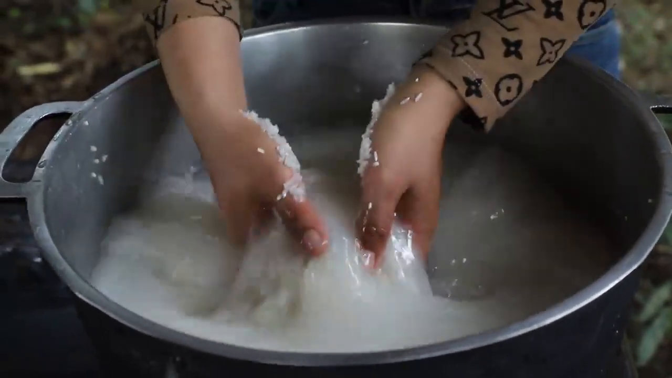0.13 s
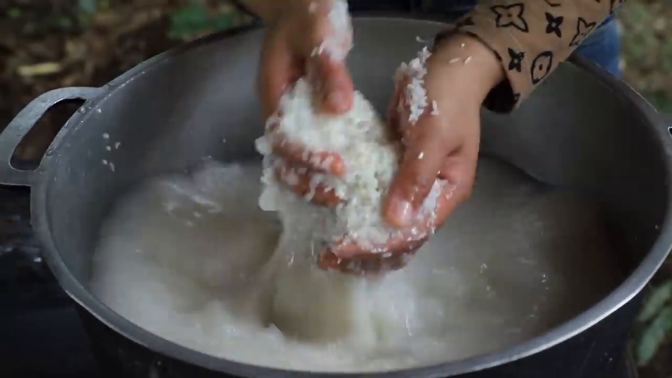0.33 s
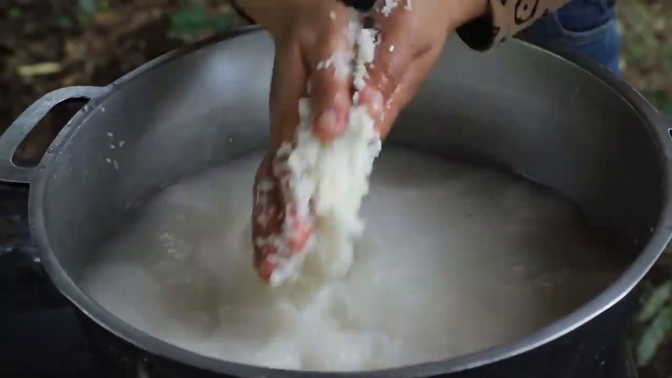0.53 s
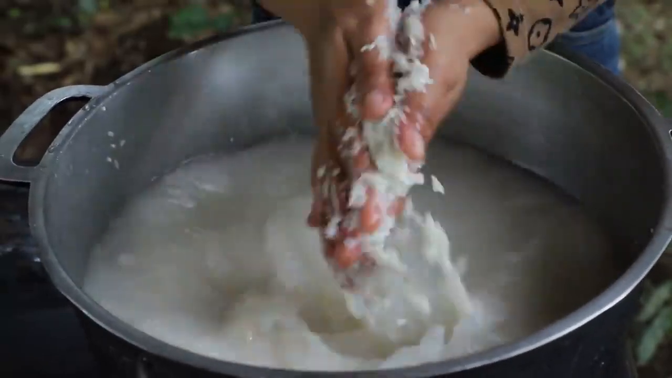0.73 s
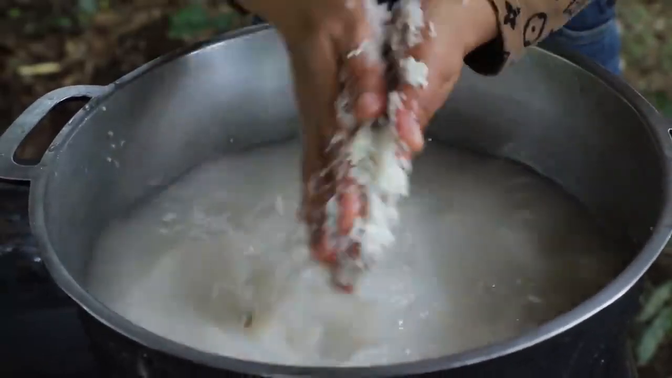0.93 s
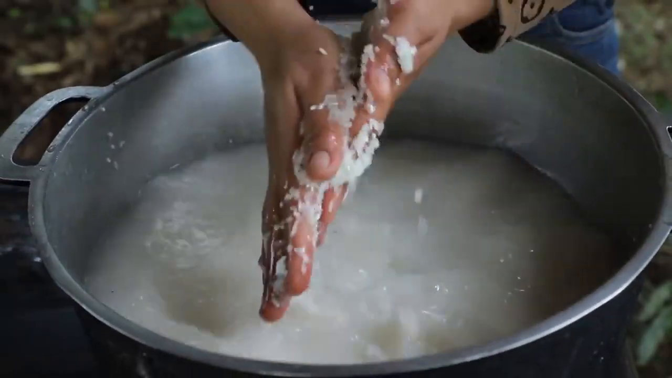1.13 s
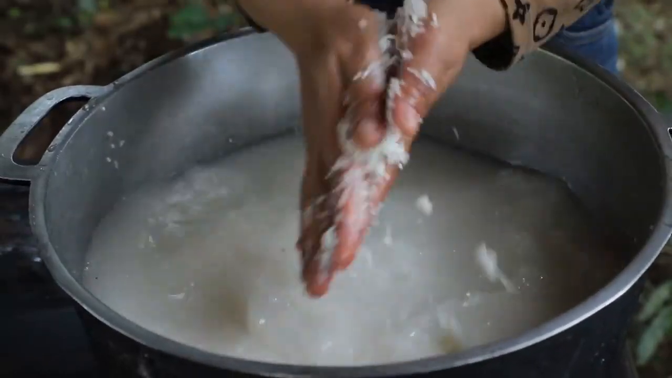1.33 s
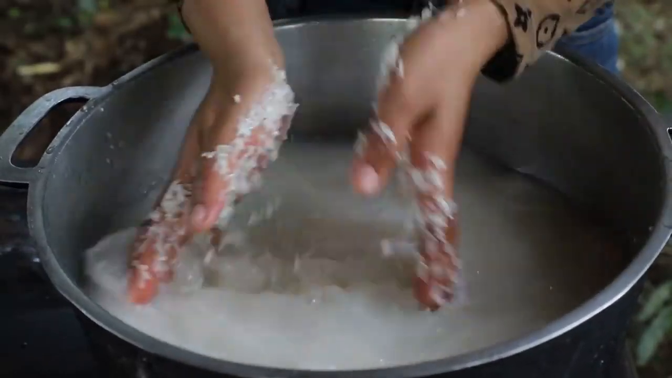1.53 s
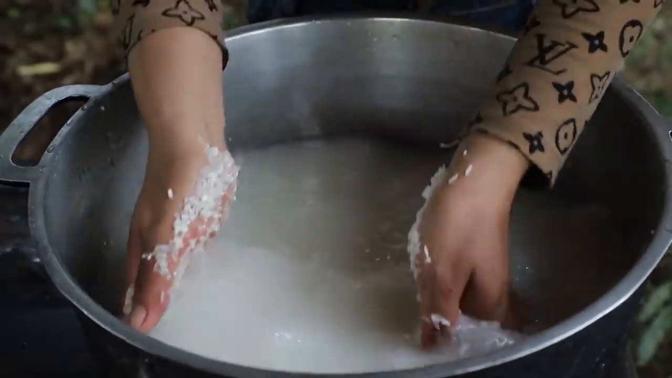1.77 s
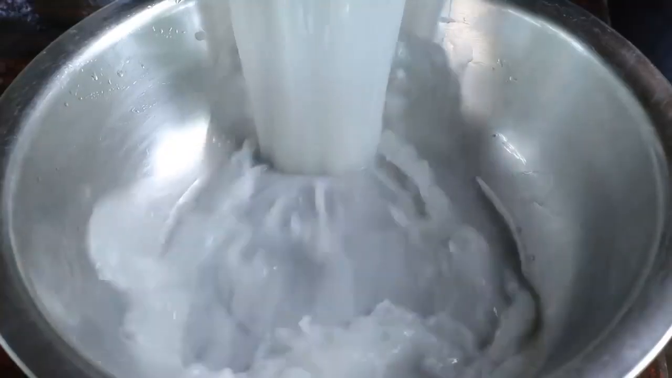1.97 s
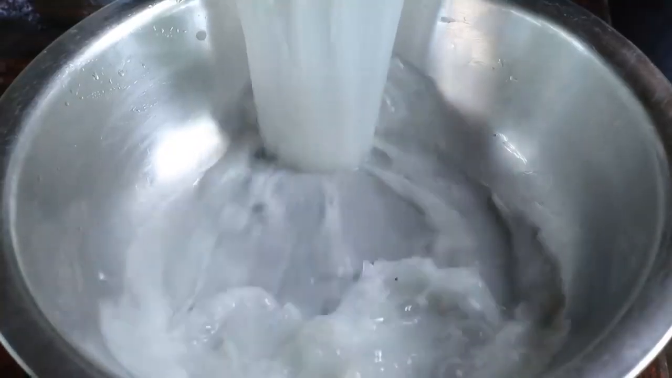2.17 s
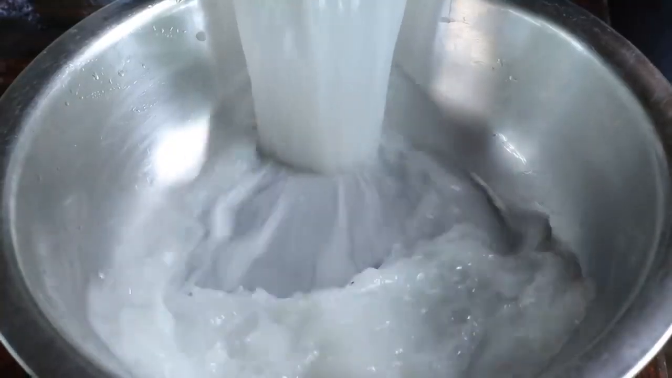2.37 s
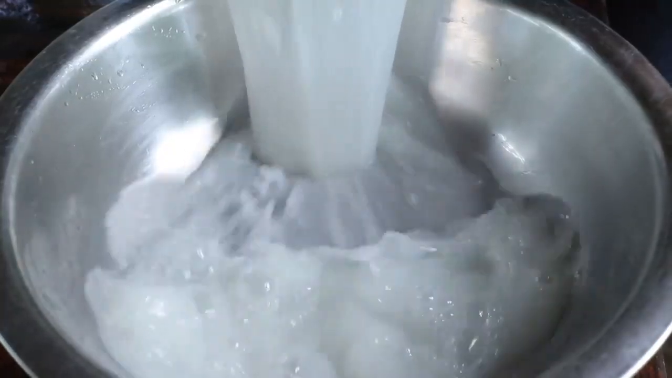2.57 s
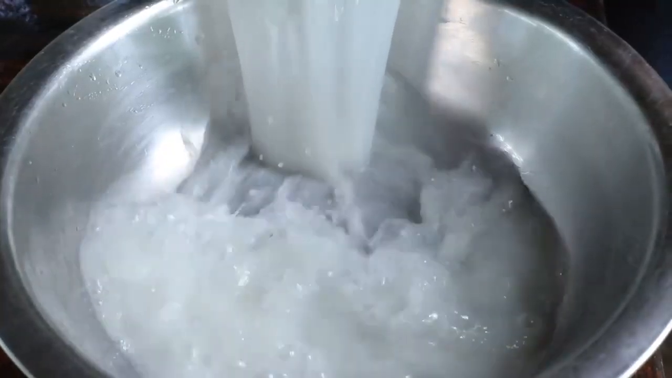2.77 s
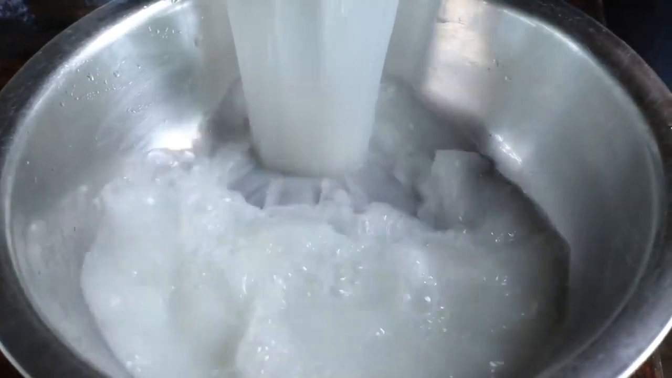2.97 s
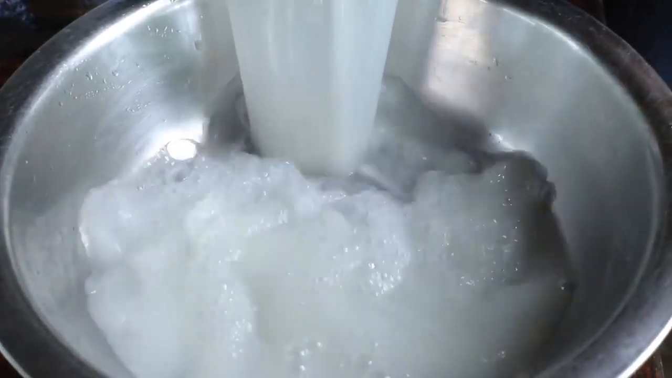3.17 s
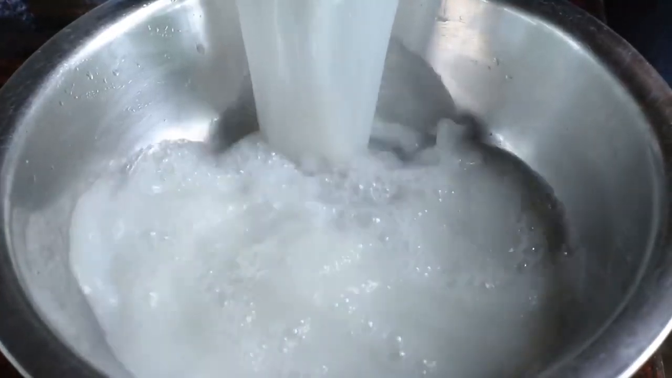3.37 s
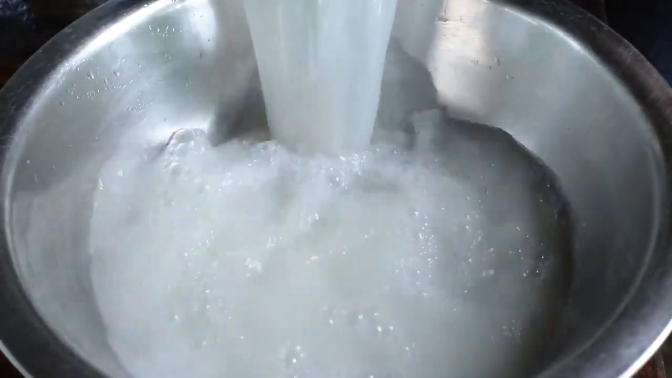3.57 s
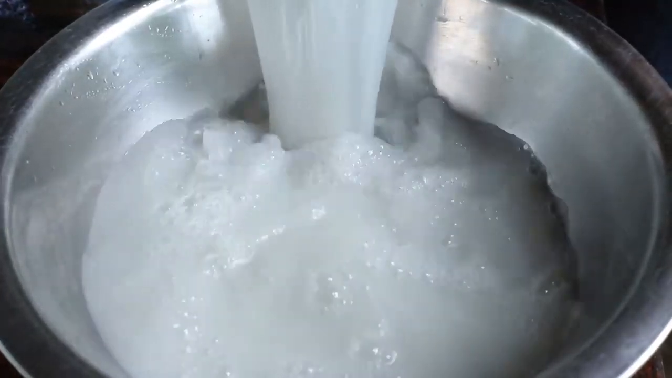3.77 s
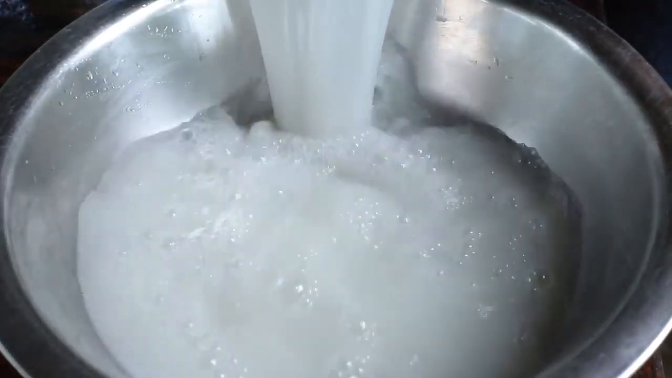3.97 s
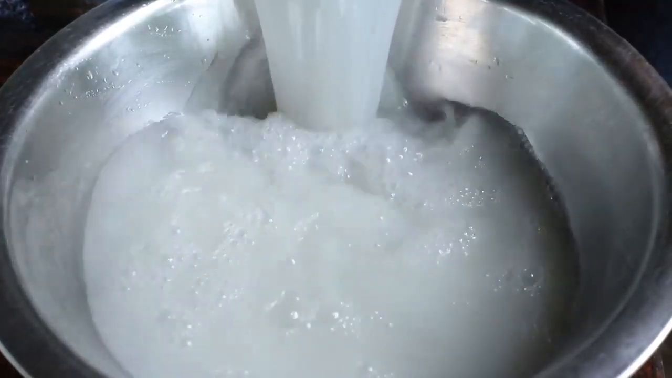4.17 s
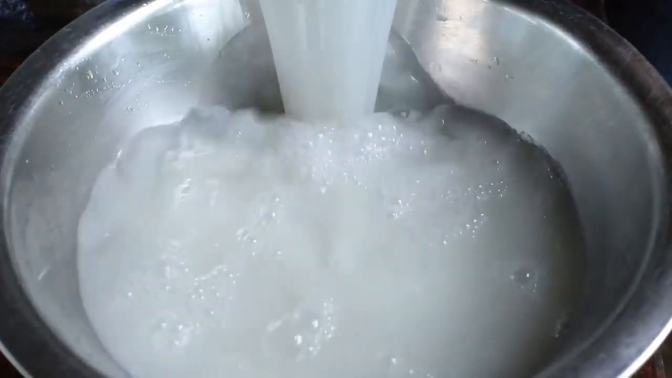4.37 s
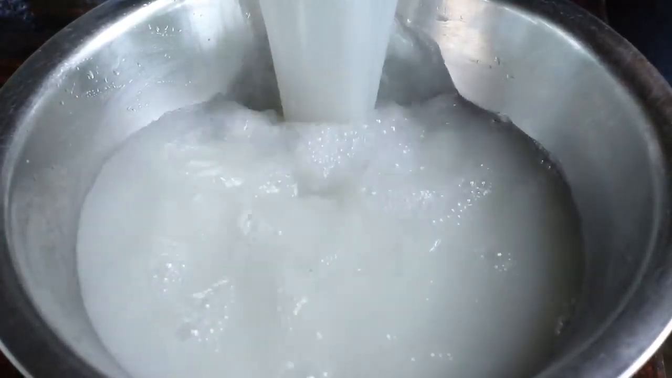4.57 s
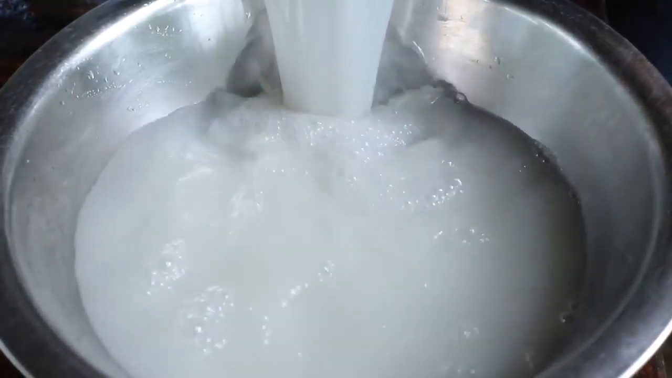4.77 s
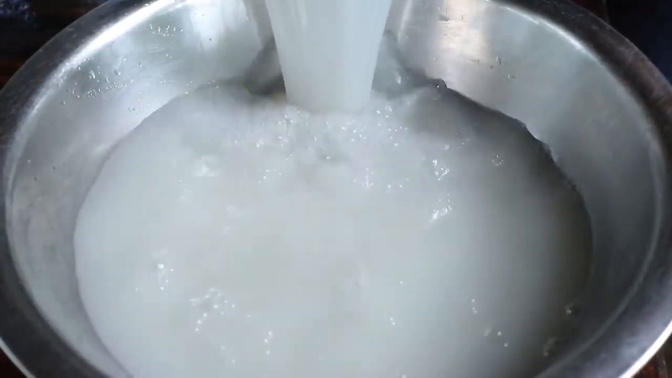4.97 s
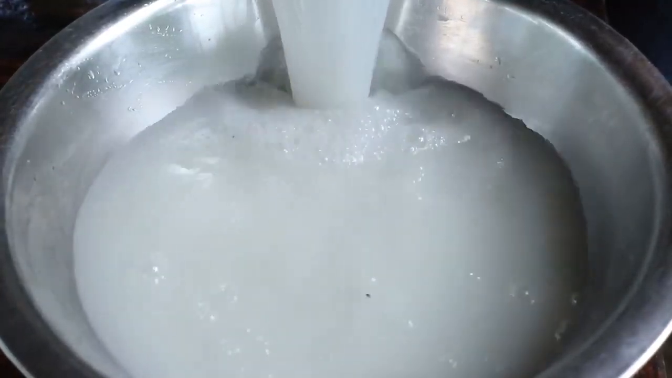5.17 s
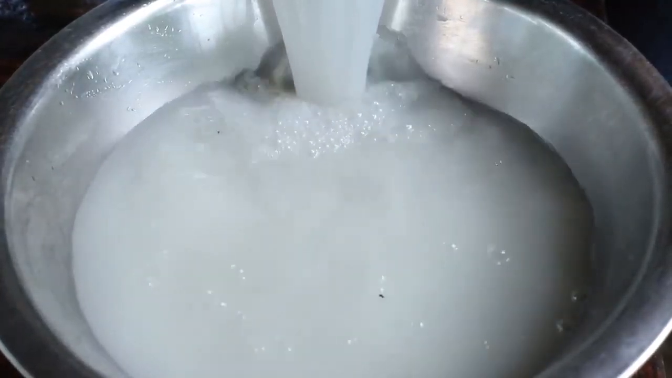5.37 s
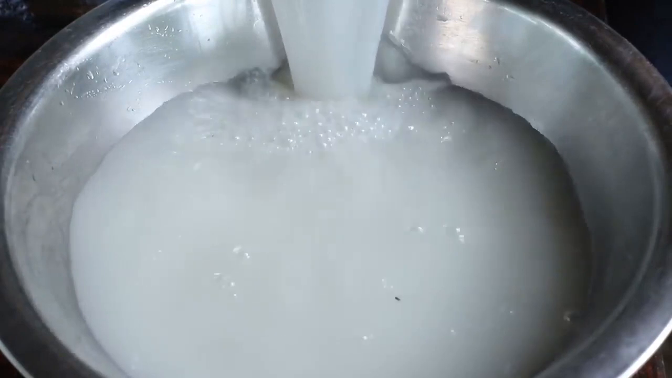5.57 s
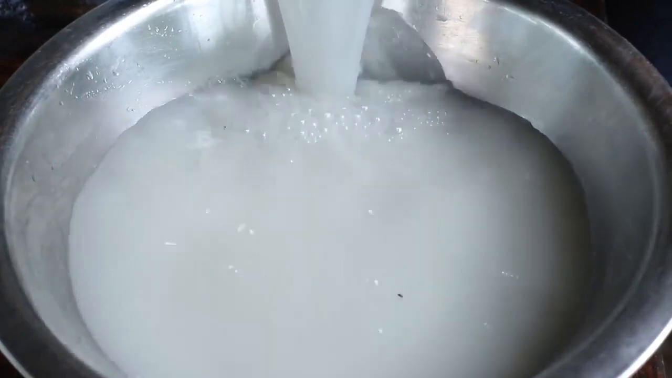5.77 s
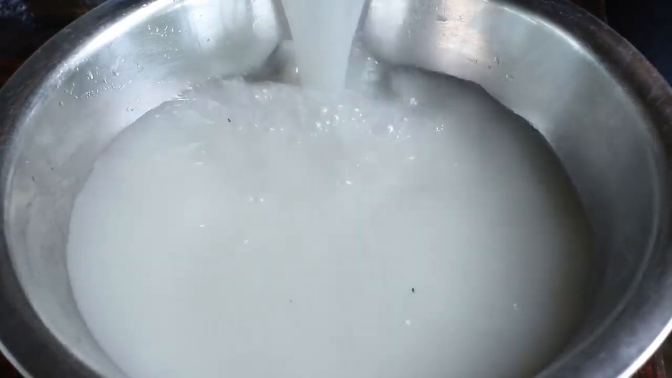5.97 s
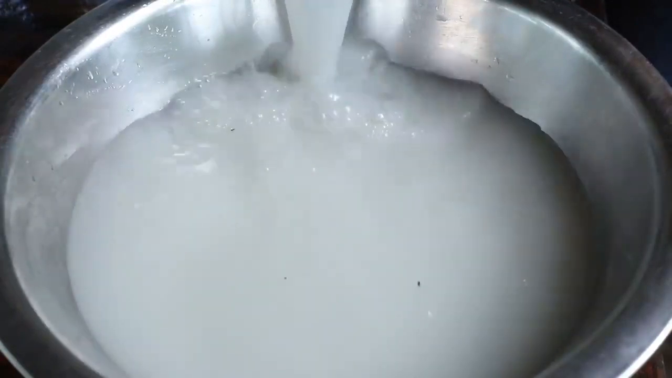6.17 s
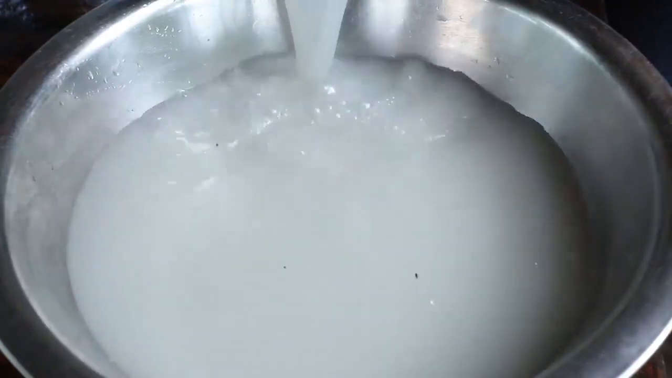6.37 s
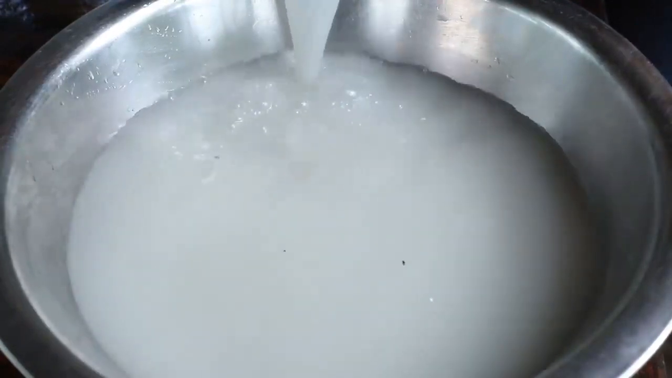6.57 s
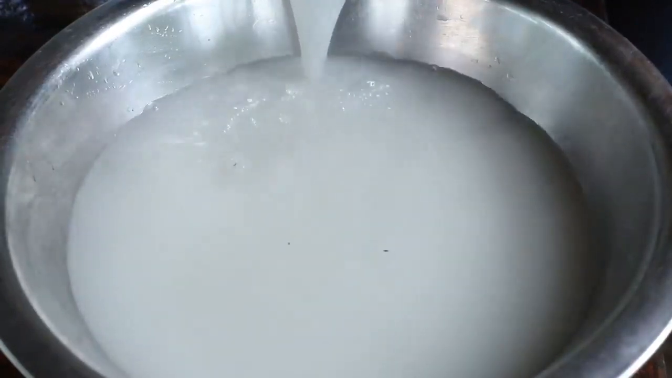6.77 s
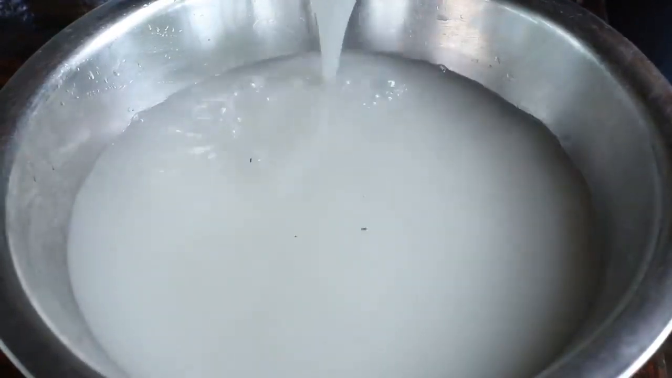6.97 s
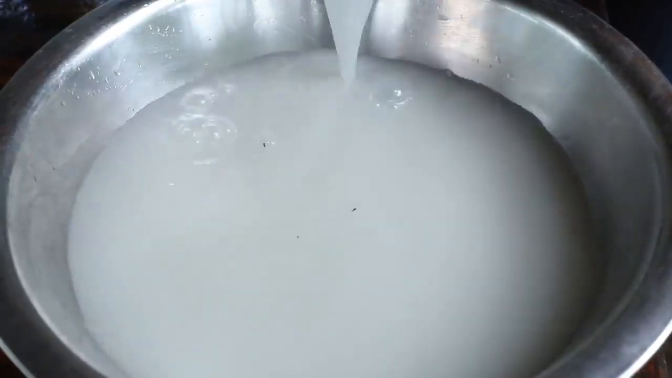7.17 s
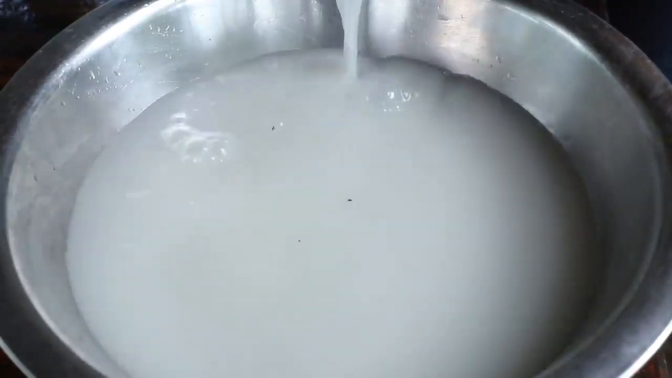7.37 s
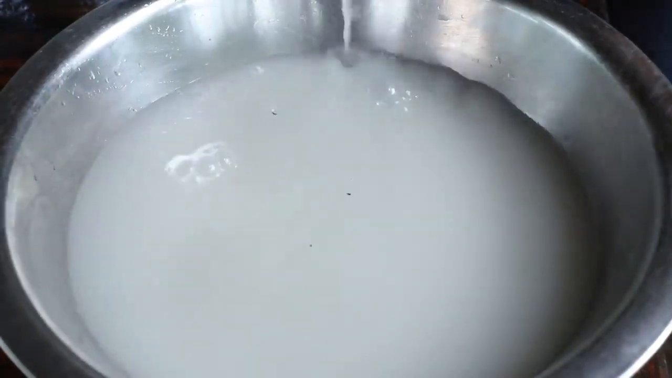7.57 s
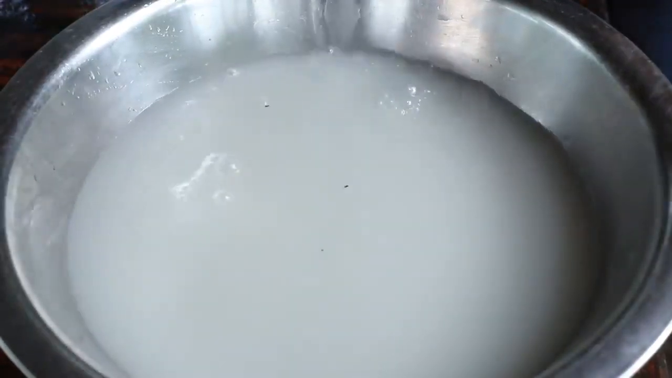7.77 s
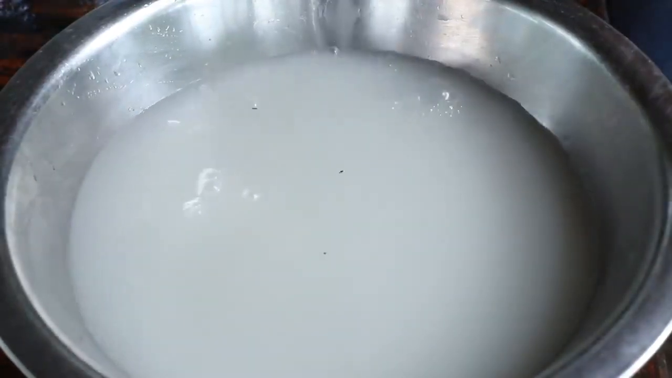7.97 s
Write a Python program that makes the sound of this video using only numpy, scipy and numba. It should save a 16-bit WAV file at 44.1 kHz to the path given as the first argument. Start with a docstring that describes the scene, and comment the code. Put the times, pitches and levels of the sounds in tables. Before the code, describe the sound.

Outdoors, close up, hands lift wet rice from a metal pot of water, with plops, a low boom, and gritty strokes of palms. After about two seconds it cuts abruptly to a much louder thick stream pouring into a steel bowl, splashing and gurgling with wet slaps. The flow gradually slims, becomes a quiet bright trickle, and ends in a dribble with a faint metallic ring.

```python
"""Outdoors: hands scoop rice from a metal pot of water and rub it between the palms; clumps plop and the pot booms.
After a sudden cut, a thick stream of milky rice water pours into a steel bowl, thins and ends in a dribble.
Trapped air sounds as decaying sines of rising pitch; rice, spray and a low rumble are clouds of brief pulses
or filtered noise; the bowl and the pot ring in their own modes, and the metal walls add a short echo."""
import sys
import numpy as np
from scipy import signal
from scipy.fft import rfft, irfft, next_fast_len
from scipy.io import wavfile
from scipy.ndimage import map_coordinates
from numba import njit

SR = 44100
rng = np.random.default_rng(int(sys.argv[2]) if len(sys.argv) > 2 else 0)


def master(y):
    """Save y as 16-bit WAV."""
    cut = np.clip(np.atleast_2d(y).T, -1, 1)
    pcm = np.round(cut * 32767)  # scale
    wavfile.write(sys.argv[1], SR, pcm.astype(np.int16))


N = 353235
T = np.arange(N) / SR
WASHING_END_S, POURING_START_S = 1.889, 1.917
TOP_HZ = 15900  # upper band limit

# the stream: start_s, splash_db (strength), gurgle_db (air dragged deep under); relative levels
STREAM = [(1.93, -33.5, -59), (2.03, -26.5, -30), (2.15, -26, -31), (2.52, -30, -32.5),
          (2.86, -24.5, -26.7), (3.07, -27.5, -31), (3.55, -26.5, -27), (4.05, -32.2, -30),
          (4.4, -34.5, -32.5), (4.88, -31, -27.5), (5.33, -39, -40), (6.0, -40, -44), (6.22, -46.5, -58.0),
          (6.7, -45, -54), (7.35, -47, -50.5), (7.72, -40, -37.5), (7.81, -37.5, -46.5), (7.87, -67, -68)]
# moments when the stream swells or falters: start_s, length_s, gain_db
SURGES = [(3.412, 0.18, 0), (3.89, .14, 1), (4.707, 0.13, 1.5), (5.393, 0.22, 2.5), (5.664, 0.11, -3),
          (5.762, 0.18, 1), (6.53, 0.2, -3), (7.17, 0.11, 4.5), (7.306, .11, -1.5), (7.41, 0.046, 2)]
# filters for the large bubbles and, by thickness of stream, the small ones and the spray: freq_hz, gain_db
GURGLE_FILTER = [(150, -42), (350, -7), (540, -1), (800, 0.5), (1050, 0.5), (1500, -1.5), (1900, -0.5),
                 (3000, -25)]
SPLASH_FULL_FILTER = [(100, -25), (880, -22), (1500, 0.5), (1770, -10.5), (2500, -3), (3170, -4.5),
                      (3560, 0), (6000, -1), (7800, -44), (13200, -120)]
SPLASH_SLIM_FILTER = [(1000, -16.5), (1700, -15), (2100, -6), (3100, -5.5), (3900, -6.5), (5000, -8),
                      (6200, -20), (9000, -54)]
SPLASH_THIN_FILTER = [(1000, -20), (1700, -13), (2100, 0), (2750, -2), (3500, 5), (4050, 7.5), (5100, 6.5),
                      (6200, 1), (9000, -67)]
SPRAY_FULL_FILTER = [(200, -19), (3000, -0.5), (5200, -3), (7500, -5.5), (10000, -11.5), (15800, -13.5)]
SPRAY_THIN_FILTER = [(3000, -16), (5200, -5), (6500, -2), (7800, 2), (11000, -11), (15800, -7)]
SURGE_RAMP_S = 0.019
SPRAY_DB, SPRAY_FALL_DB_PER_S = -3.5, 2  # deeper water swallows the spray
THREAD_SPRAY_DB, DROPLETS_DB = -12, -11.5  # a thin thread spits and throws off single droplets


def pouring():
    """Air entrainment: large bubbles gurgle, small ones splash and bursting foam sprays."""
    flow_db, air_db = curves(STREAM)
    full = np.clip((5.4 - T) / 1.16, 0, 1)  # the thick stream slims down ...
    thin = np.clip((T - 5.9) / 0.5, 0, 1)  # ... and then narrows to a thread
    slim = 1 - full - thin
    surge_db = sum(db * swell(s, length, SURGE_RAMP_S, SURGE_RAMP_S) for s, length, db in SURGES)
    # a thin stream breaks into lumps
    lumps_db = (1.16 + 0.92 * (1 - full)) * wobble(45) + 1.27 * wobble(170)

    deep = cloud(count=3400, hz=gurgle_pitch(), octaves=0.221, cycles=23, scatter_db=3.5, rise=0.2)
    shallow = cloud(count=4500, hz=1298, octaves=0.244, cycles=19.5, scatter_db=4.0, rise=0.097)
    gurgle = coloured(deep + amp(0.5) * shallow, GURGLE_FILTER)

    dense = cloud(count=44000, hz=3052, octaves=0.644, cycles=12.6, scatter_db=4.0, rise=0.38)
    tinkling = cloud(count=3500, hz=3466, octaves=0.449, cycles=37, scatter_db=4.5, rise=0.34)
    small = dense + amp(-5.0) * (1 - full) * tinkling  # single bubbles stand out as the flow drops
    splash = full * coloured(small, SPLASH_FULL_FILTER)
    splash += slim * coloured(small, SPLASH_SLIM_FILTER)
    splash += thin * coloured(small, SPLASH_THIN_FILTER)

    fine = cloud(count=40000, hz=9200, octaves=0.53, cycles=8.6, scatter_db=5.5, rise=0.13)
    bursts = crackle(count=9000, scatter_db=7.5)
    mist = fine + amp(-6) * bursts + amp(-10) * rng.standard_normal(N)
    droplets = cloud(count=900, hz=8180, octaves=0.31, cycles=13, scatter_db=4.5, rise=0.2)
    spray_gain = amp(SPRAY_DB - SPRAY_FALL_DB_PER_S * (T - POURING_START_S))
    thread_spray = amp(THREAD_SPRAY_DB) * coloured(mist, SPRAY_THIN_FILTER) + amp(DROPLETS_DB) * droplets
    spray = (1 - thin) * spray_gain * coloured(mist, SPRAY_FULL_FILTER) + thin * thread_spray

    # while the water is shallow the stream also drums on the steel bottom
    drum_filter = [(40, -46), (170, -2.5), (480, 0.0), (900, -0.5), (2000, -52)]
    drum = full * coloured(rng.standard_normal(N), drum_filter)
    water = amp(air_db - 1.0) * gurgle + amp(flow_db + 0.2) * (splash + spray + amp(-21) * drum)
    return water * amp(surge_db + lumps_db) * lulls() * (T > POURING_START_S)


# the stream digs a hollow and frees larger, lower bubbles: centre_s, drop_octaves
GLUGS = [(2.2, 0.44), (2.64, 0.6), (3.099, 0.52), (3.72, 0.43), (3.92, 0.337), (4.55, 0.27), (4.99, .3)]
GLUG_S = 0.121  # from the centre of a glug to 1/e of its dip
GURGLE_HZ, SAG_OCT_PER_S = 1195, 0.0885


def gurgle_pitch():
    """Bubble resonance: larger is lower, so the pitch sinks as the bowl fills and dips at each glug."""
    dips = sum(octaves * np.exp(-((T - s) / GLUG_S) ** 2) for s, octaves in GLUGS)
    return GURGLE_HZ * 2 ** (-SAG_OCT_PER_S * (T - POURING_START_S) - dips)


# wet slaps of water on water: start_s, level_db (relative), pitch_hz (main pocket of trapped air)
SPLATS = [(0.353, -19, 1160), (.552, -21.5, 790), (.623, -18, 1280), (.826, -7, 1714), (1.853, -21.5, 1620),
          (2.211, -14.5, 890), (2.344, -9, 3900), (2.366, -5, 1360), (2.437, -10.5, 1390),
          (2.827, -5.5, 3470), (2.847, -5.5, 926), (2.882, -9, 1410), (2.96, -6.5, 1380),
          (3.03, -14.5, 980), (3.182, -7.5, 3630), (3.259, -14, 1170), (3.395, -6.5, 978),
          (3.442, -10.5, 1310), (4.354, -14.5, 1480), (4.618, -14, 1093), (4.806, -8, 1080),
          (4.817, -20, 1450), (4.874, -7, 1220), (5.597, -15.5, 2390), (5.636, -17.5, 2980),
          (5.819, -15, 1030), (5.887, -12.5, 2910), (6.056, -19, 1047), (6.988, -21.5, 3980),
          (7.05, -25, 870), (7.091, -21, 800), (7.436, -22, 4020), (7.602, -23, 907), (7.675, -20, 890),
          (7.715, -22, 643), (7.804, -29, 1380)]
LULL_DB, LULL_S = 0.5, 0.033  # the water heaps up and quietens just before each slap


def splats():
    """Impact and cavity resonance: a burst of spray, a damped pocket of air, then smaller ones as it breaks up."""
    s, db, hz = np.transpose(SPLATS).copy()
    pockets = bubbles(s, amp(db - 5.5), hz, 0.029 + 11 / hz, np.full(len(s), .15))
    for delay, shrink in rng.random((len(s), 5, 2)).transpose(1, 2, 0):
        part_hz = hz * 2 ** (0.92 * shrink - .35)
        part_size = amp(db - 8.5 - 9.3 * delay)
        pockets += bubbles(s + .012 * delay, part_size, part_hz, 0.0038 + 9 / part_hz, shrink / 4)
    t = T[:SR // 10]
    burst = signal.oaconvolve(impulses(s, db), amp(-60 * t / 0.02) * (1 - np.exp(-t / 0.0019)))[:N]
    spray_filter = [(300, -13.5), (1000, 3.5), (4500, 2.5), (8000, -17), (15000, -19)]
    return pockets + amp(-8.0) * burst * coloured(rng.standard_normal(N), spray_filter)


def lulls():
    """Amplitude modulation: a gain that sinks before each slap and returns with it."""
    lead = T[:int(LULL_S * SR)] / LULL_S
    slaps = np.bincount([int(s * SR) for s, db, hz in SPLATS], minlength=N)
    dips = signal.oaconvolve(slaps, np.sqrt(lead))[len(lead) - 1:][:N]  # each dip ends at its slap
    return amp(-LULL_DB * np.minimum(dips, 1))


# thin films of water snapping: start_s, level_db (relative)
TICKS = [(.277, -28), (0.737, -19), (1.702, -21), (1.856, -27), (3.258, -10.5), (5.978, -28), (7.715, -27)]


def ticks():
    """Impulsive release: a snapping film gives a few milliseconds of very bright noise."""
    s, db = np.transpose(TICKS)
    snap = signal.oaconvolve(impulses(s, db), amp(-60 * T[:SR // 50] / 0.024))[:N]
    bright = coloured(rng.standard_normal(N), [(1000, -8), (5000, 0), (11000, -4), (16000, -8)])
    return amp(-5) * snap * bright


# resonances of the steel bowl: freq_hz, bandwidth_hz, level_db
BOWL_MODES = [(641, 1.9, 3), (690, 13, -1), (862, 19, -7), (1030, 39, -29), (1500, 2, 8.5), (1990, 92, 2),
              (3420, 10, 1), (4070, 29, -2), (4430, 30, -11), (5070, 11, 8), (4730, 68, 3.5)]


def bowl(x):
    """Modal resonance: the steel rings under the water, most when the last dribble runs onto its bare side."""
    def modes(f):
        return sum(amp(db) * 1j * f * w / (c * c - f * f + 1j * f * w) for c, w, db in BOWL_MODES)
    contact_db, = curves([(2, -14), (4, -9), (6.3, -9), (7.1, 0.5), (7.9, 0.5)])
    return amp(contact_db) * filtered(x, modes) * (T > POURING_START_S)


# strokes of the palms over the wet rice: start_s, length_s, level_db (relative)
STROKES = [(.605, 0.1, -35.5), (.725, 0.15, -33), (.875, 0.16, -32.5), (1.03, 0.11, -30),
           (1.17, 0.13, -32.5), (1.325, 0.1, -29), (1.44, 0.15, -32.5), (1.675, 0.11, -42),
           (1.825, .05, -36.5)]
# rice shifting in the hands, first under water, then lifted out: start_s, length_s, level_db (relative)
HANDFULS = [(-.1, 0.57, -59.5), (.3, 1.55, -45)]
# filter for the wet grains: freq_hz, gain_db
RICE_FILTER = [(290, -56), (500, -20.5), (1040, -12), (1220, -10), (1590, -11.5), (2120, -9.5), (3420, -5),
               (4430, -1), (6180, -7.5), (7560, -6), (13500, -13), (15800, -15)]
LOOSE_GRAINS_DB = -47.5  # grains and drops that fall off the hands


def rubbing():
    """Granular friction: wet grains slip over each other at every stroke; a few snap, loose ones fall."""
    strokes = gestures(STROKES, attack_s=0.039, release_s=0.054)
    pressure = np.hypot(strokes, gestures(HANDFULS, attack_s=0.2, release_s=0.3))
    grains = cloud(count=70000, hz=6300, octaves=0.84, cycles=9.2, scatter_db=4.0, rise=0)
    snaps = crackle(count=4000, scatter_db=5.0)
    friction = rng.standard_normal(N)
    slipping = coloured(grains + amp(1) * friction + amp(-4) * snaps, RICE_FILTER)
    rubbed = pressure * amp(1.87 + 1.3 * wobble(70.54)) * slipping
    loose = coloured(cloud(count=2400, hz=6560, octaves=0.55, cycles=6, scatter_db=4.5, rise=0), RICE_FILTER)
    return rubbed + amp(LOOSE_GRAINS_DB) * loose * swell(0.27, 1.7, attack_s=.1, release_s=.05)


# the hands move through the water: start_s, length_s, level_db (relative)
STIRS = [(-.05, 0.23, -52.5), (.27, 0.25, -43), (.42, 0.34, -39), (.75, .42, -42), (1.15, 0.44, -55),
         (1.7, 0.19, -39)]
# single bubbles under hands and clumps: start_s, level_db (relative), pitch_hz, pitch_rise (share over its life)
PLOPS = [(0.317, -31, 696, .01), (.356, -24.5, 1177, .15), (.38, -21.5, 2210, .27), (.398, -31, 1007, .01),
         (.552, -26.5, 1224, .01), (.624, -33, 780, .01), (.658, -38, 860, .01), (.671, -28, 1170, 0.19),
         (.711, -30.5, 1740, .7), (0.753, -21.5, 3100, 0.063), (.827, -21.5, 1330, .05),
         (.879, -28, 1930, .12), (0.973, -29.5, 1210, .01), (1.011, -26, 1750, 0.46), (1.04, -26, 1820, .9),
         (1.024, -31.5, 950, .1), (1.05, -31.5, 867, .01), (1.422, -21, 1880, .01), (1.718, -29, 940, 0.8),
         (1.734, -19, 1160, 0.35)]
PLOP_CYCLES = 65  # swings before a bubble has died away by 60 dB


def sloshing():
    """Bubble resonance: stirred water burbles, drops fall from the fingers, single pockets of air ring out."""
    burble = cloud(count=3000, hz=1206, octaves=0.5, cycles=36, scatter_db=3.5, rise=0.22)
    drops = cloud(count=2000, hz=3690, octaves=0.442, cycles=38, scatter_db=4.5, rise=0.45)
    water_filter = [(400, -4.5), (800, -1.0), (5000, -0.5), (8000, 1), (14000, -17)]
    stirred = coloured(burble + amp(1) * drops, water_filter)
    s, db, hz, rise = np.transpose(PLOPS).copy()
    plops = bubbles(s, amp(db + 1.5), hz, PLOP_CYCLES / hz, rise)
    return gestures(STIRS, attack_s=0.05, release_s=0.1) * stirred * lulls() + plops


def gulp():
    """Cavity resonance: air sucked in as the hands leave the water rises in pitch as it shrinks, then collapses."""
    # start_s, pitch_hz, level_db
    pitch_hz, level_db = curves([(.437, 481, -90), (.4395, 498, -21.5), (.459, 696, -27.5),
                                 (.469, 735, -20), (.482, 760, -98)])
    return amp(level_db) * np.sin(2 * np.pi * np.cumsum(pitch_hz) / SR) * (T < .5)


# clumps of rice landing in the pot: start_s, level_db (relative)
THUMPS = [(0.459, -13.5), (.638, -18.5)]
# modes of the pot full of water: freq_hz, level_db (relative), t60_s
POT_MODES = [(55.7, -16, 0.79), (117.7, -1.5, 0.14), (111, -22, 0.97), (148, 12.5, 0.04), (178, -3, 0.15),
             (360, -3.5, 0.059)]


def pot():
    """Modal excitation: a heavy clump pushes on the water and sets the pot's bottom booming."""
    out = np.zeros(N)
    t = T[:SR]
    ring = sum(amp(level - 60 * t / t60) * np.sin(2 * np.pi * hz * t) for hz, level, t60 in POT_MODES)
    push = 1 - np.exp(-t / 0.006)
    for s, db in THUMPS:
        out[int(s * SR):][:SR] += amp(db) * ring * push
    return signal.sosfilt(signal.butter(4, 42, "high", fs=SR, output="sos"), out)


# decay of the echoes between the metal walls: freq_hz, t60_s
WALL_DECAY = [(300, 0.045), (1000, 0.047), (4500, 0.021), (8000, 0.022), (15000, 0.017)]


def walls(x, wet_db):
    """Reverberation: the vessel's short, dense echo, which keeps changing as the water moves."""
    size = 4096
    pieces = signal.stft(x, nperseg=size, nfft=2 * size)[2].T
    # a fresh decaying noise tail for every piece of sound
    hz, t, z = signal.stft(rng.standard_normal((len(pieces), size)), SR, nperseg=128)
    decay = amp(-60 * t / along(WALL_DECAY, hz)[:, None])
    tails = signal.istft(z * decay, SR, nperseg=128)[1]
    echoes = irfft(pieces * rfft(tails, 2 * size))
    # overlap-add the echoes
    place = np.arange(len(pieces))[:, None] * (size // 2) + np.arange(2 * size)
    echo = np.std(x) * unit(np.bincount(place.ravel(), echoes.ravel())[size // 2:][:N])
    return (x + amp(wet_db) * echo) / np.hypot(1, amp(wet_db))


# spectrum of the open air: freq_hz, gain_db
AIR_FILTER = [(20, -13), (45, -6.5), (80, -2.5), (125, 1.5), (190, -8.5), (300, -12.5), (700, -18),
              (1500, -28.5), (5000, -17.5), (15000, -33.5)]


def outdoors():
    """Filtered noise: a low, steady rumble of the open air."""
    return amp(-53.0) * coloured(rng.standard_normal(N), AIR_FILTER)


@njit
def bubbles(start, size, hz, t60, rise):
    """Bubble resonance: each is a dying sine whose pitch climbs as it nears the surface."""
    out = np.zeros(N)
    for k in range(len(start)):
        first, life = int(start[k] * SR), int(t60[k] * SR) + 2
        for i in range(max(0, -first), min(life, N - first)):
            age = i / life
            cycles = hz[k] * i / SR * (1 + rise[k] * age / 2)
            envelope = np.exp(-6.9 * age) * min(1., 2 * cycles)
            out[first + i] += size[k] * envelope * np.sin(2 * np.pi * cycles)
    return out


def cloud(count, hz, octaves, cycles, scatter_db, rise):
    """Random superposition: bubbles at random moments around a pitch, many faint, a few strong; rms 1."""
    when, strength = rng.random((2, count))
    pitch, life = rng.standard_normal((2, count))
    centre_hz = np.broadcast_to(hz, N)[(when * N).astype(int)]
    pitch_hz = np.clip(centre_hz * 2 ** (octaves * pitch), 200, TOP_HZ)
    size = amp(-scatter_db * np.log(strength + .01))
    t60 = cycles * np.exp(life / 2) / pitch_hz
    return unit(bubbles(when * T[-1], size, pitch_hz, t60, np.full(count, rise)))


def crackle(count, scatter_db):
    """Impulse noise: tiny sharp contacts of very unequal strength, at rms 1."""
    size = amp(-scatter_db * np.log(rng.random(count) + .001))
    return unit(np.bincount(rng.integers(0, N, count), size * rng.choice([-1, 1], count), N))


def impulses(s, db):
    """Impulse excitation: one click per event."""
    return np.bincount((s * SR).astype(int), amp(db), N)


def swell(start, length, attack_s, release_s):
    """Envelope: a smooth attack, hold and release between 0 and 1."""
    ramp = np.clip(np.minimum((T - start) / attack_s, (start + length - T) / release_s), 0, 1)
    return np.sin(np.pi / 2 * ramp)


def gestures(rows, attack_s, release_s):
    """Superposed envelopes: the summed gain of (start_s, length_s, level_db) movements."""
    return sum(amp(db) * swell(s, length, attack_s, release_s) for s, length, db in rows)


def wobble(rate):
    """Random modulation: straight lines between random knots, rate knots a second."""
    return map_coordinates(rng.standard_normal(4096), [T * rate], order=1, mode="wrap")


def curves(rows):
    """Linear interpolation: one value per sample for each column after the time."""
    s, *cols = np.transpose(rows)
    return [np.interp(T, s, c) for c in cols]


def along(points, hz):
    """Logarithmic frequency scale: interpolate (freq_hz, value) points on it."""
    f, v = np.transpose(points)
    return np.interp(np.log(hz + 1), np.log(f + 1), v)


def filtered(x, response):
    """Linear filtering: x times a complex response of frequency."""
    m = next_fast_len(N + SR // 2)
    return irfft(rfft(x, m) * response(np.fft.rfftfreq(m, 1 / SR)), m)[:N]


def coloured(x, spectrum):
    """Minimum-phase filtering: x through a causal filter of that spectrum, at rms 1."""
    size = 4096
    cepstrum = irfft(np.log(amp(along(spectrum, np.fft.rfftfreq(size, 1 / SR))) + 1e-6))
    # folding the cepstrum makes the filter causal
    cepstrum[1:size // 2] *= 2
    cepstrum[size // 2 + 1:] = 0
    return unit(signal.oaconvolve(x, irfft(np.exp(rfft(cepstrum))))[:N])


def amp(db):
    """Decibel scale: level to amplitude gain."""
    return 10 ** (np.asarray(db) / 20)


def unit(x):
    """Normalisation: scale to rms 1."""
    return x / np.sqrt(np.mean(x ** 2) + 1e-20)


def scene():
    """Superposition: water sounds inside their metal vessels, over the open air."""
    stream = pouring()
    slaps = splats() + ticks()
    washing = (rubbing() + sloshing() + gulp()) * (T < WASHING_END_S)
    water = walls(washing + slaps, wet_db=-8.0) + walls(stream, wet_db=-5.0)
    return (water + bowl(stream + slaps) + pot() + outdoors())[None]


def record(dry):
    """Gating and band limiting: a moment of silence between washing and pouring, and no treble above TOP_HZ."""
    live = (T < WASHING_END_S) | (T > POURING_START_S)
    return filtered(dry[0] * live, lambda hz: hz < TOP_HZ)[None]


dry = scene()
out = record(dry)
master(out)
```